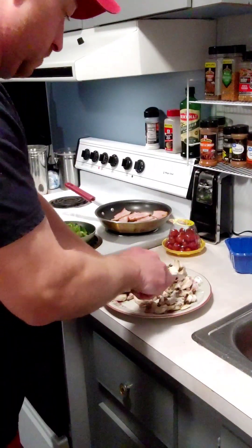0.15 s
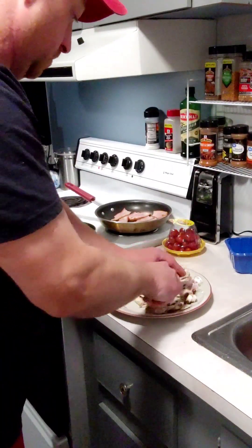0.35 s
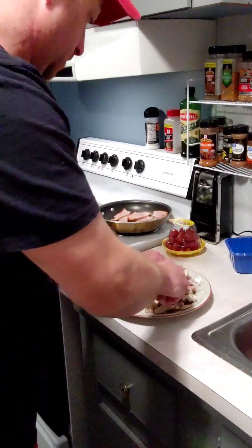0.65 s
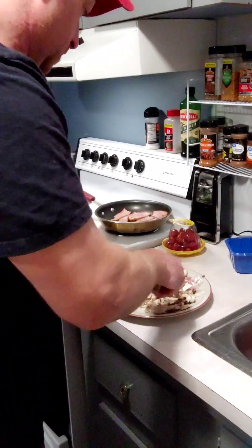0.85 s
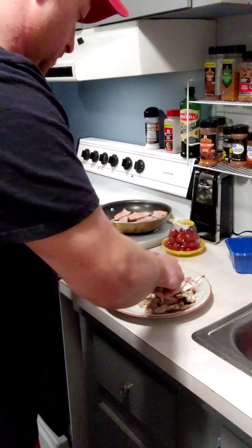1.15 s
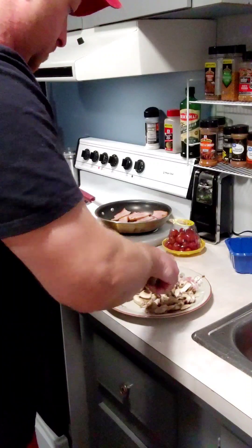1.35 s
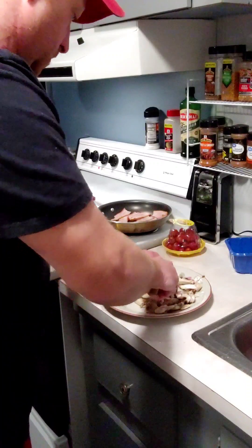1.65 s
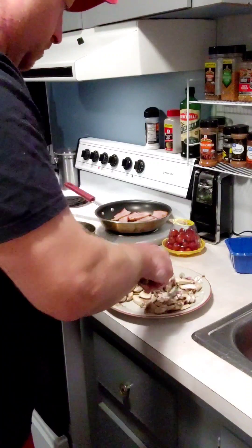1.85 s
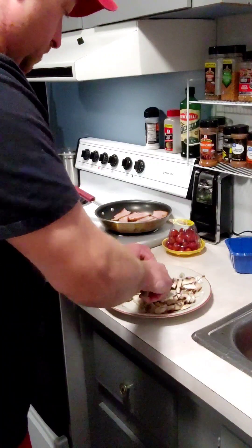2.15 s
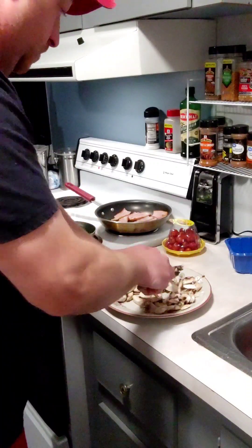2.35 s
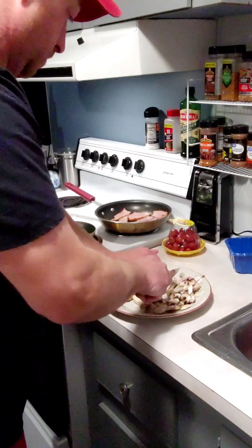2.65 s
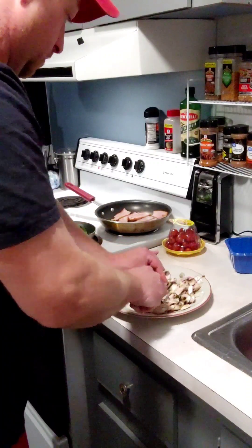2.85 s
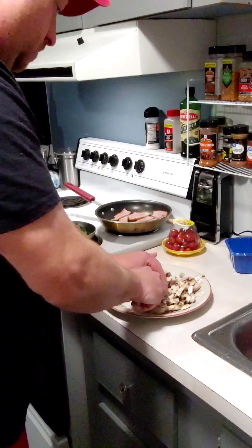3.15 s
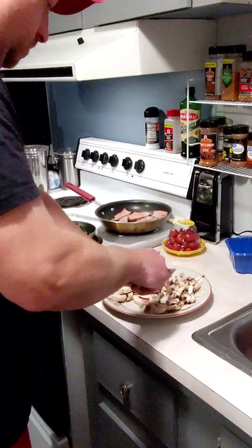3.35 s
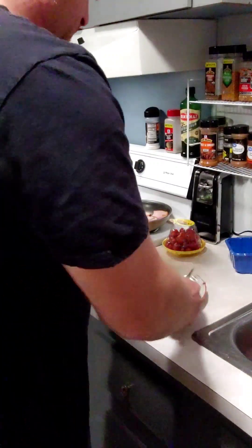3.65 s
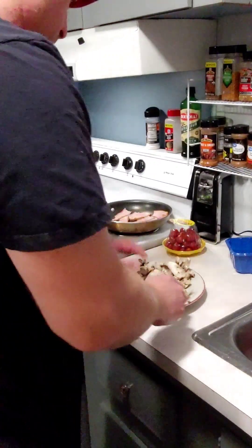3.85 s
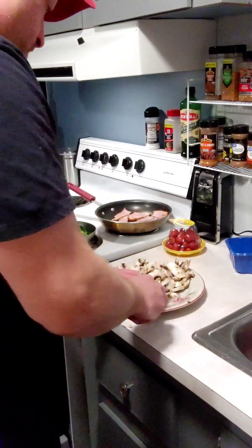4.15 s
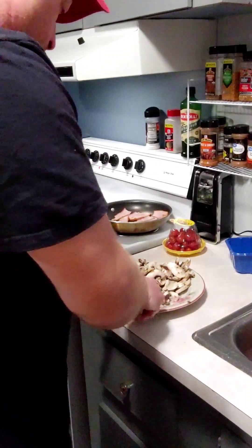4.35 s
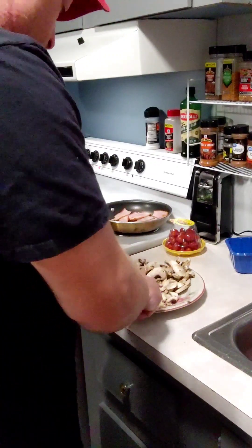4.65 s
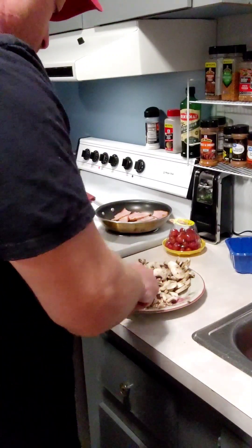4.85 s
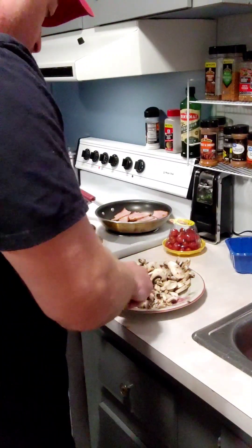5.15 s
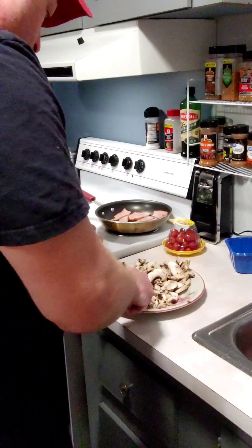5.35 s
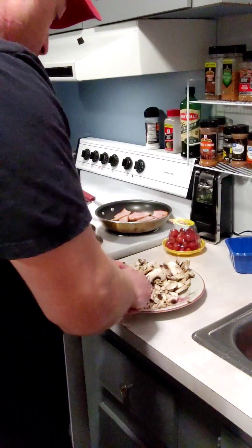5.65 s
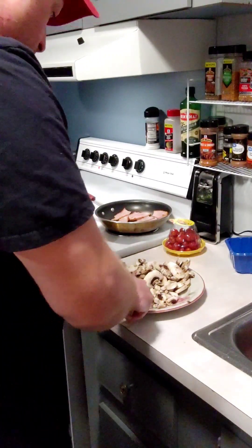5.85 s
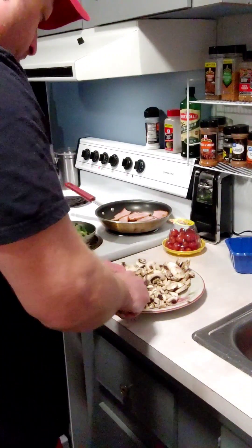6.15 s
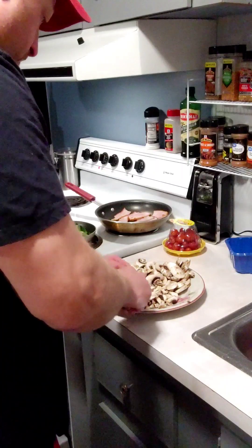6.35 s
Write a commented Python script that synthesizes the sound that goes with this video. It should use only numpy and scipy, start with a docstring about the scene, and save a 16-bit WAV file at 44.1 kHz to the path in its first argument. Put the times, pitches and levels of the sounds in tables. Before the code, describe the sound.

A knife cuts mushrooms on a ceramic plate, clacking unevenly over a steady kitchen hum and faint pan hiss.

```python
"""A small kitchen, stereo microphone close to a ceramic plate on the counter, where mushrooms are cut.
The knife shears through each piece and clacks on the plate, whose ring is damped by the food and changes
with the place struck; the counter thuds below. Slices snap and are pushed about between cuts.
Behind them lie a steady appliance rumble, moving air and a faint hiss from the pan, which sink after
each loud cut as the microphone's gain control ducks, and then creep back."""
import sys
import numpy as np
from scipy import signal
from scipy.io import wavfile
from scipy.ndimage import uniform_filter1d

SR = 44100
rng = np.random.default_rng(int(sys.argv[2]) if len(sys.argv) > 2 else 0)


def materialize(psi):
    """Save the field psi as 16-bit PCM at rate SR to the path in sys.argv[1].

    A 1-D psi becomes a single channel; in a 2-D psi each row is a channel.
    """
    bounded = np.clip(np.atleast_2d(psi).T, -1, 1)
    quanta = np.round(bounded * 32767).astype(np.int16)
    wavfile.write(sys.argv[1], SR, quanta)


N = 287091
TIME = np.arange(N) / SR

FIRM_DB = -25   # ring level of a firm cut; effort is counted from here
HARDNESS_PER_DB, THUD_PER_DB = 0.15, 0.67   # per dB of effort: ring tilt [dB/octave], thud [dB]
REBOUND_DB, REBOUND_PER_DB = -9.5, 0.36   # the more flesh is sheared, the less cleanly the edge lands
# Thud under a firm cut in the middle, halfway and at the rim: (level [dB], centre [Hz])
THUD_BY_PLACE = [(-29.5, 487), (-25, 554), (-43, 370)]
# Knife meeting plate, close to the microphone: (time [s], ring level [dB],
# place [0 middle, 1 halfway, 2 rim], shear against the hit [dB], lead mode [Hz], its boost [dB])
KNIFE_CUTS = [(.412, -44.5, 0.39, -47, 3200, 10.5), (.7212, -34.5, 0.18, 5.5, 1772, 12.5),
              (.8185, -41.5, 0.36, 6, 4845, 22.5), (1.0815, -31.5, 0.13, -41, 2390, 8),
              (1.3228, -27, 0.19, -5, 2230, 3), (1.667, -44, 0.23, -12, 1400, 9.5),
              (1.7395, -30, 0.094, 1.5, 3100, 1.5), (2.1485, -44, 0.046, -33, 7060, 2),
              (2.2078, -28.5, 0.15, -9, 2693, 15), (2.5535, -31, 0.88, -19, 4400, 6.5),
              (2.8061, -22.5, 1.16, -10, 4730, 3), (3.0649, -32, 1.23, 0.5, 6970, 2.5),
              (4.0073, -47.5, .15, 8, 3240, 19.5), (4.059, -38, 1.66, -5, 3130, 1.5),
              (4.3842, -37.5, 1.72, 3, 3280, 5), (4.774, -31.5, 1.62, 2, 2210, 10),
              (5.0315, -20.5, 1.81, -15.5, 1880, -1), (5.2999, -20.5, 1.6, -3.5, 1640, 1),
              (5.5383, -20.5, 1.49, 3.5, 1650, 3), (5.8525, -29, 1.54, 4.5, 4630, 5),
              (6.0901, -24.5, 1.536, -10, 4600, 5), (6.2955, -22, 1.46, 10, 4910, 16.5)]
def knife_on_plate(tails, crack_db=-15, crack_hz=1500, crack_t60=0.003, room_db=1.0):
    """Each cut is a dry crack, the plate's ring and a thud, sent into the room from a shifting spot."""
    out, before_hit = np.zeros((2, N)), SR // 80
    t = np.arange(-before_hit, SR // 16) / SR
    for k, (s, ring_db, place, shear_db, lead_hz, lead_db) in enumerate(KNIFE_CUTS):
        effort_db = ring_db - FIRM_DB
        thud_db, thud_hz = [np.interp(place, [0, 1, 2], col) for col in np.transpose(THUD_BY_PLACE)]
        blade = blade_force(t, shear_db, REBOUND_DB + REBOUND_PER_DB * shear_db)
        force = near_paths(blade)
        thud = counter_thud(force, thud_db + THUD_PER_DB * effort_db, thud_hz)
        crack = struck(force, crack_hz, crack_t60, ring_db + crack_db, pan_db=0)
        contact = (ring_db, place, HARDNESS_PER_DB * effort_db, lead_hz, lead_db)
        direct = plate_ring(force, *contact, detune=0.0051, t60_scale=0.78)
        # the room gathers the plate's sound from all sides, where the modes blur into broad bands
        all_round = from_db(room_db) * plate_ring(blade[None], *contact, detune=.01, t60_scale=.3)
        room = signal.fftconvolve(thud + crack + all_round, tails[k % len(tails)], axes=1)
        start = round(s * SR) - before_hit
        add(out, direct + thud + crack, start)
        add(out, room, start)
    return out


def blade_force(t, shear_db, rebound_db, shear_s=0.0015, chatter_s=0.0016, bounce_s=0.0041):
    """Fibres give way ever faster, the edge lands at t = 0, then chatters and bounces once."""
    grit = rng.standard_normal((2, len(t)))
    shear = grit[0] * np.exp(-abs(t) / shear_s) * (t < 0)
    chatter = grit[1] * np.exp(-abs(t) / chatter_s) * (t > 0)
    force = from_db(shear_db) * shear / np.linalg.norm(shear)
    force += from_db(rebound_db) * chatter / np.linalg.norm(chatter)
    force[np.searchsorted(t, 0)] += 1
    force[np.searchsorted(t, bounce_s * rng.uniform(.8, 1.2))] += from_db(rebound_db)
    return force


# Modes of plate and blade, heard close up: (pitch [Hz], t60 before damping [s],
# level struck in the middle [dB], halfway [dB], at the rim [dB], left over right [dB])
PLATE_MODES = [(1103, 0.033, -17.5, -13, -17, -15.5), (1407, 0.033, -4.5, -6, -18, -1.5),
               (1654, 0.076, -25, -5.5, -4.5, -7), (1713, 0.039, -9.5, -0.5, -10, 8),
               (1842, 0.04, -29.5, -4.5, -8, 13.5), (2264, 0.045, -0.5, -6.5, -16, 13.5),
               (2462, 0.097, -9.5, -11.5, -12.5, -8.5), (2874, 0.032, -2, 3.5, -9, 2.5),
               (3030, 0.038, -2.5, -4.5, -6, -6), (3170, 0.2, -13.5, -22.5, -17.5, -5),
               (3740, 0.004, -10, -14.5, -14.5, -14), (4498, 0.033, -9, 6, -16, 1),
               (4586, 0.093, -9.5, -4.5, -16.5, -2), (4790, 0.045, -23.5, -32.5, -17, -2.5),
               (5216, 0.029, -26.5, -26.5, -22, 25.5), (6923, 0.038, -7.5, 3, -23.5, 8),
               (7063, 0.052, -16.5, -8.5, -5.5, 0.5), (8530, 0.0062, -33.5, -29.5, -16.5, 12.5),
               (9010, 0.018, -14, -0.5, -27.5, 5.5), (9590, 0.075, -20, -19.5, -15, 0),
               (11050, 0.026, -16.5, -7, -48, 14.5), (12270, 0.035, -17.5, -15.5, -22, 3.5),
               (14300, 0.035, -19.5, -12, -31.5, 2)]
def plate_ring(force, ring_db, place, hardness, lead_hz, lead_db, detune, t60_scale):
    """The contact point sets each mode's share; the pressing blade and the food shift and damp them."""
    sound = 0
    for hz, t60, *place_db, pan_db in PLATE_MODES:
        boost_db = lead_db * nearness(hz, lead_hz, octaves=0.089)
        mode_db = np.interp(place, [0, 1, 2], place_db) + hardness * np.log2(hz / 2500) + boost_db
        mode_t60 = t60 * t60_scale * from_db(0.19 * boost_db)  # the lead mode is damped least
        mode_hz = hz * (1 + detune * rng.normal())
        sound += struck(force, mode_hz, mode_t60, ring_db + mode_db, pan_db)
    return sound


# The plate rocking on the counter: (pitch [Hz], t60 [s], relative level [dB], left over right [dB])
COUNTER_MODES = [(188, 0.051, -8, 4), (402.3, 0.079, -2, -4), (470, 0.044, -7.5, 0.5), (592, 0.025, -3, -4),
                 (624, 0.09, -6.5, -6), (837, 0.007, -7, -11)]
def counter_thud(force, thud_db, thud_hz, focus_db=8):
    """The plate's foot knocks on the counter, most strongly around one pitch."""
    sound = 0
    for hz, t60, mode_db, pan_db in COUNTER_MODES:
        off_centre_db = focus_db * (nearness(hz, thud_hz, octaves=0.49) - 1)
        mode_hz = hz * (1 + 0.043 * rng.normal())
        sound += struck(force[[1, 1]], mode_hz, t60, thud_db + mode_db + off_centre_db, pan_db)
    return sound


# The thud under the chop at 0.72 s, close by: (time [s], level [dB], centre [Hz])
HEAVY_CHOP_THUD = [(.7212, -27.5, 640)]
def heavy_chop_thud():
    """One chop lands with an extra-heavy, broad thud from the counter."""
    out = np.zeros((2, N))
    force = near_paths(signal.unit_impulse(SR // 8))
    for s, db, hz in HEAVY_CHOP_THUD:
        add(out, counter_thud(force, db, hz, focus_db=3), round(s * SR))
    return out


# Moist flesh snapping close by, and a barely audible bright tick at 1.49 s: (time [s], level [dB])
SNAPS_AND_TICK = [(.412, -44.5), (0.717, -42), (1.491, -74), (2.048, -55), (2.433, -48), (4.369, -64),
                  (4.489, -62)]
def snaps_and_tick(attack_s=.001, decay_s=0.0054, low_hz=5000, grain_db=5):
    """A few milliseconds of fine, bright crackle: tearing fibres, or at its faintest just a tick."""
    out, t = np.zeros((2, N)), np.arange(SR // 16) / SR
    high_pass = signal.butter(2, low_hz, "high", fs=SR, output="sos")
    envelope = np.exp(-t / decay_s) * (1 - np.exp(-t / attack_s))
    for s, db in SNAPS_AND_TICK:
        grains = rng.standard_normal(len(t)) * from_db(grain_db * rng.standard_normal(len(t)))
        crackle = rms_one(signal.sosfilt(high_pass, grains)) * envelope
        add(out, near_paths(from_db(db) * crackle), round(s * SR))
    return out


LIGHT_PUSH_DB, DULLING_PER_DB = -56, 0.75   # pushes dull by this [dB/octave] per dB above a light one
# Slices pushed over the plate, faint even this close: (peak time [s], half-width [s], level [dB])
SLICE_PUSHES = [(.81, 0.01, -48), (.845, 0.061, -50.5), (1.32, 0.014, -44), (2.205, 0.014, -40.5),
                (3.317, 0.043, -53), (3.573, 0.039, -69.5), (3.798, 0.077, -55.5), (4.249, 0.021, -58),
                (4.502, 0.036, -55)]
def sliding_slices(grains_per_s=1500, grain_db=23.0, t60_scale=0.62):
    """Sticking and slipping slices tickle the heavily damped plate with fine grains."""
    out = np.zeros((2, N))
    for s, half_width, db in SLICE_PUSHES:
        tilt = DULLING_PER_DB * (LIGHT_PUSH_DB - db)
        t = np.arange(-2 * half_width, 2 * half_width, 1 / SR)
        slips = rng.random((2, SR))[:, :len(t)] < grains_per_s / SR
        grains = slips * from_db(grain_db * rng.uniform(-1.1, 1, (2, SR))[:, :len(t)])
        scrape = 0
        for hz, t60, middle_db, _, rim_db, _ in PLATE_MODES:
            mode_db = max(middle_db, rim_db) + tilt * np.log2(hz / 1000)
            scrape += from_db(mode_db) * rms_one(ring(grains, hz, t60 * t60_scale))
        swell = np.exp(-(t / half_width) ** 2)
        add(out, from_db(db) * swell * rms_one(scrape), round((s + t[0]) * SR))
    return out


# Counter, stove and walls as they reach the microphone:
# (left delay [s], right delay [s], left level [dB], right level [dB])
REFLECTIONS = [(.0011, 0.001238, -9, -0.5), (.0040, .0037, -10.5, 2.5), (.0068, 0.0073, -7.5, -5),
               (0.0143, .0138, -22.5, -13), (0.028, .0248, -32.5, -12.5)]
def near_paths(force, wander=.1):
    """Direct sound and first reflections, whose paths shift as the hands move."""
    out = np.array([force, force])
    for left_s, right_s, left_db, right_db in REFLECTIONS:
        stretch = 1 + wander * rng.uniform(-1, 1)
        out[0] += from_db(left_db) * np.roll(force, int(left_s * stretch * SR))
        out[1] += from_db(right_db) * np.roll(force, int(right_s * stretch * SR))
    return out


# The kitchen's reverberation, heard from the counter: (frequency [Hz], level [dB])
TAIL_LEVELS = [(250, -13), (700, -13.5), (1700, -9), (3000, -9), (4700, -15.5), (7000, -12.5),
               (9500, -11.5), (14000, -12)]
# Its decay: (frequency [Hz], t60 [s])
TAIL_DECAYS = [(250, 0.13), (1700, 0.23), (4700, 0.18), (9000, 0.16), (14000, 0.12)]
def kitchen_tails(spots=7, build_s=0.019):
    """Diffuse tails for a few spots: noise builds after the first reflections and dies band by band."""
    t = np.arange(SR // 4) / SR
    tails = 0
    for hz, pair in noise_bands(size=spots * len(t), first_band=11):
        shape = np.exp(-np.log(1000) * t / at_hz(TAIL_DECAYS, hz)) * (1 - np.exp(-(t / build_s) ** 2))
        gain = from_db(at_hz(TAIL_LEVELS, hz)) / np.linalg.norm(shape)
        tails += gain * shape * pair.reshape(spots, 2, -1)
    return tails


# Appliance, air and pan, farther off in the room: (frequency [Hz], relative spectral density [dB])
APPLIANCE_SPECTRUM = [(20, -2), (35, -1), (55, 3.5), (85, -1.5), (130, -1), (200, -0.5), (280, -14.5),
                      (400, -32)]
AIR_SPECTRUM = [(200, -2.5), (350, 6), (480, -1), (700, 5), (1000, 0.5), (1500, -16.5), (2500, -57.5),
                (4000, -51)]
PAN_SPECTRUM = [(1500, 18.5), (2700, 18), (3800, 1.5), (4700, 22.5), (5500, -4), (6700, 13), (8200, 7),
                (9600, -34.5), (11300, -8.5), (12800, 5.5), (14500, -11), (16000, -18.5)]
# How alike they reach the microphone's two sides: (frequency [Hz], correlation [0-1])
STEREO_LIKENESS = [(60, 0.96), (290, 0.99), (640, 0.73), (1400, 0), (3000, 0), (15000, 0)]
def appliance_air_and_pan(rumble_db=-47.5, air_db=-50.5, hiss_db=-61, flicker_db=0.67, flicker_hz=9.4):
    """Steady rumble, moving air and pan hiss; alike in both channels only in the bass."""
    layers = np.zeros((3, 2, N))
    for hz, (mid, side) in noise_bands(size=N):
        alike = at_hz(STEREO_LIKENESS, hz)
        band = np.sqrt(1 + alike) * mid + np.sqrt(1 - alike) * side * [[1], [-1]]
        band *= from_db(flicker_db * drift(flicker_hz))
        for layer, spectrum in zip(layers, (APPLIANCE_SPECTRUM, AIR_SPECTRUM, PAN_SPECTRUM)):
            if spectrum[0][0] / 1.2 < hz < spectrum[-1][0] * 1.2:
                layer += band * from_db(at_hz(spectrum, hz))
    rumble, air, hiss = [from_db(db) * rms_one(x) for db, x in zip((rumble_db, air_db, hiss_db), layers)]
    return rumble * pan(1) + air * pan(-3) + hiss


def gain_control(x, threshold_db=-27, slope=0.7, sense_hz=3500, attack_s=0.029, release_s=0.37):
    """Sharp, bright peaks turn the gain down, and it creeps back."""
    treble = signal.sosfilt(signal.butter(1, sense_hz, "high", fs=SR, output="sos"), x)
    power = uniform_filter1d(np.mean(treble ** 2, axis=0), size=SR // 200)
    duck_db = np.maximum(slope * (10 * np.log10(np.maximum(power, 1e-12)) - threshold_db), 1e-6)
    duck_db[0] = 3.0  # it starts a little turned down
    recovery = np.exp(-TIME / release_s)
    held_db = np.maximum.accumulate(duck_db / recovery) * recovery
    pole = np.exp(-1 / (attack_s * SR))
    return x * from_db(-signal.lfilter([1 - pole], [1, -pole], held_db))


def struck(force, hz, t60, level_db, pan_db, span_s=0.0082):
    """A mode holding the energy of level_db kept up for span_s, placed between the channels."""
    tone = ring(force, hz, t60)
    tone = tone / np.linalg.norm(tone, axis=1, keepdims=True) * np.sqrt(span_s * SR)
    return tone * from_db(level_db) * pan(pan_db)


def ring(force, hz, t60):
    """One decaying mode, silent far below and above its pitch."""
    w = 2 * np.pi * hz / SR
    radii = np.exp(-np.log(1000) / (t60 * SR)), np.exp(-w / 4)  # the mode, then a broad band-pass
    tiny = 1e-18 * np.sin(np.arange(force.shape[1]))  # keeps the decay from underflowing
    return signal.sosfilt([[1, 0, -1, 1, -2 * r * np.cos(w), r * r] for r in radii], force + tiny)


def noise_bands(size, first_band=0):
    """Third-octave bands of two unrelated noises: yields (Hz, pair)."""
    edges = 18 * 2 ** (np.arange(first_band, 31) / 3)
    white = rng.standard_normal((2, 2, size))
    for k, (low, high) in enumerate(zip(edges, edges[1:])):
        band_pass = signal.butter(2, [low, high], "band", fs=SR, output="sos")
        yield np.sqrt(low * high), signal.sosfilt(band_pass, white[k % 2])


def drift(hz, step=40, settle=2000):
    """Slow random wander with spread 1."""
    r = np.exp(-2 * np.pi * hz * step / SR)
    white = rng.standard_normal(N // step + settle + 2)
    slow = signal.lfilter([1], [1, -2 * r, r * r], white)[settle:]
    return np.interp(np.arange(N) / step, np.arange(len(slow)), rms_one(slow))


def nearness(hz, centre_hz, octaves):
    """1 at the centre, falling away over the given width."""
    return np.exp(-(np.log2(hz / centre_hz) / octaves) ** 2)


def at_hz(points, hz):
    """Read a table on a log-frequency axis."""
    points = np.array(points)
    return np.interp(np.log(hz), np.log(points[:, 0]), points[:, 1])


def from_db(db):
    """Decibels to gain."""
    return np.exp(np.asarray(db) * (np.log(10) / 20))


def pan(db):
    """Channel gains with the left louder by db."""
    return from_db([[db / 2], [-db / 2]])


def rms_one(x):
    """Scale to rms 1."""
    return x / np.sqrt(np.mean(x ** 2) + 1e-20)


def add(out, sound, start):
    """Mix a stereo sound in at a sample."""
    part = sound[:, :N - start]
    out[:, start:start + part.shape[1]] += part


def scene():
    """At the counter: cuts, one heavy thud, sliding and snapping food, with the kitchen behind."""
    tails = kitchen_tails()
    handling = sliding_slices() + heavy_chop_thud() + snaps_and_tick()
    handling_room = signal.fftconvolve(handling, tails[0], axes=1)[:, :N]
    return knife_on_plate(tails) + handling + handling_room + appliance_air_and_pan()


def record(dry, dip_hz=10900, dip_q=8.0, dip_db=-11, cutoff_hz=15400):
    """The microphone's gain ducks after loud cuts; the treble has a narrow dip and a steep top cut."""
    ducked = gain_control(dry)
    dip_band = signal.lfilter(*signal.iirpeak(dip_hz, dip_q, fs=SR), ducked)
    dipped = ducked - (1 - from_db(dip_db)) * dip_band
    return signal.sosfilt(signal.ellip(10, .2, 80, cutoff_hz, fs=SR, output="sos"), dipped)


dry = scene()
out = record(dry)
materialize(out)
```